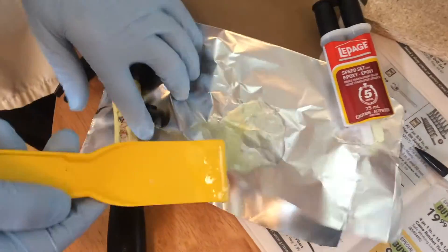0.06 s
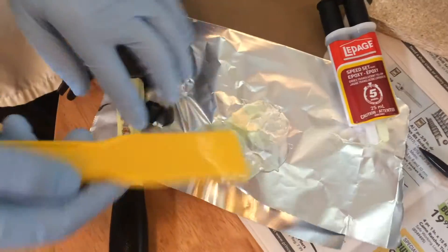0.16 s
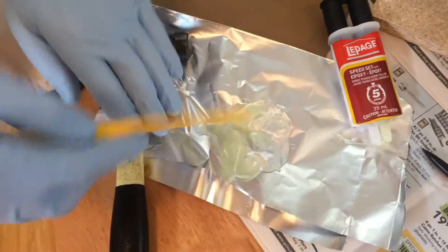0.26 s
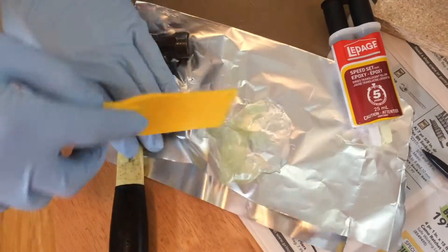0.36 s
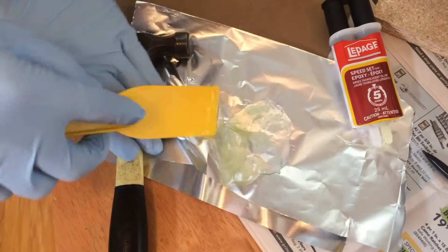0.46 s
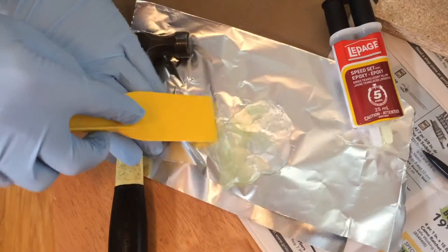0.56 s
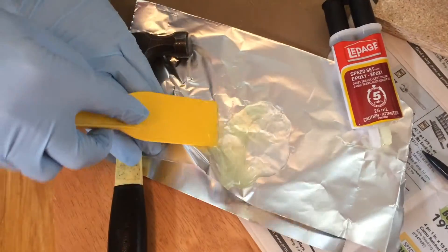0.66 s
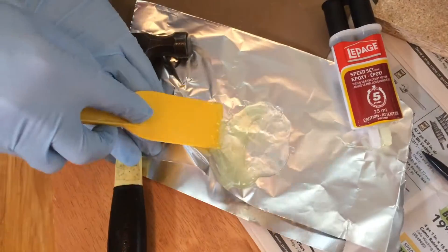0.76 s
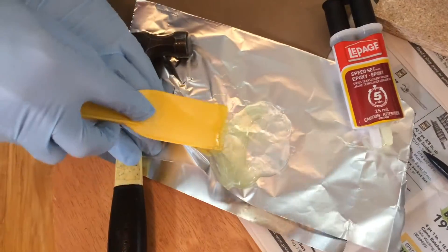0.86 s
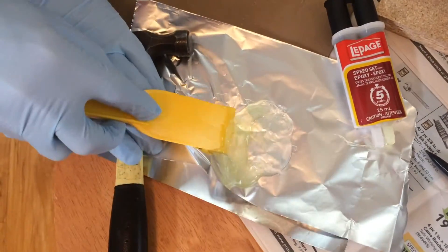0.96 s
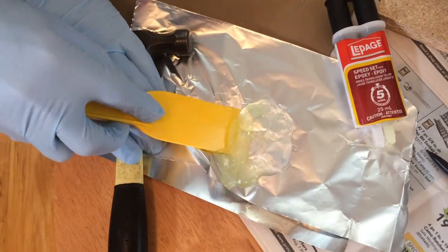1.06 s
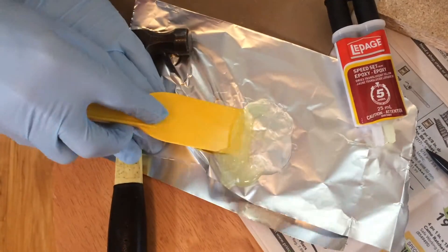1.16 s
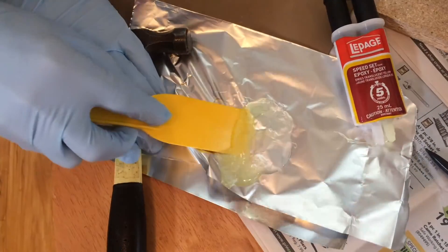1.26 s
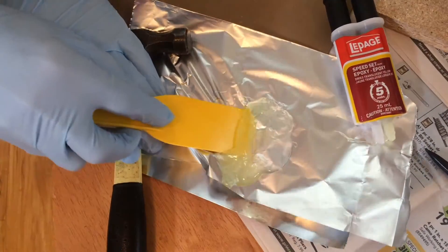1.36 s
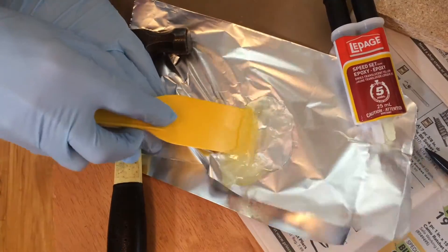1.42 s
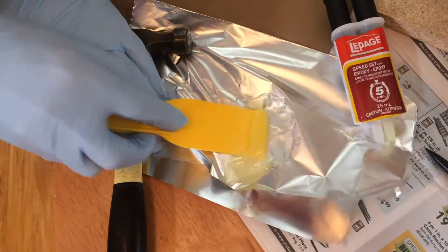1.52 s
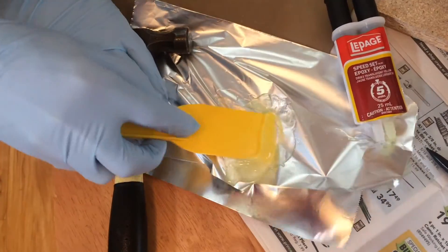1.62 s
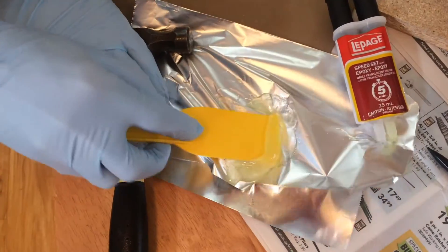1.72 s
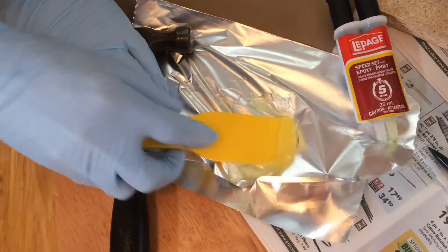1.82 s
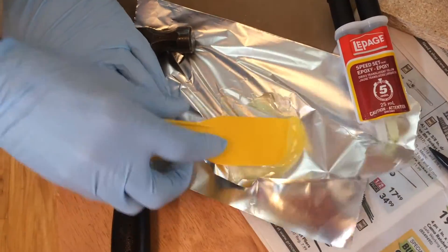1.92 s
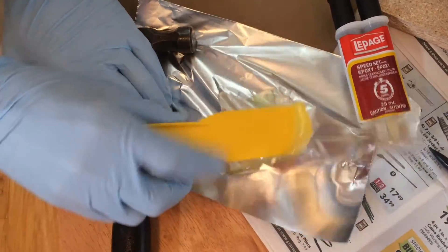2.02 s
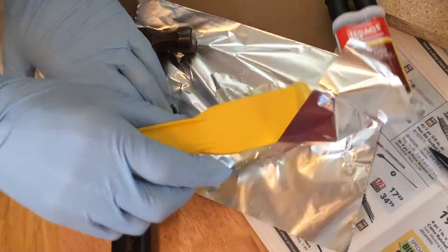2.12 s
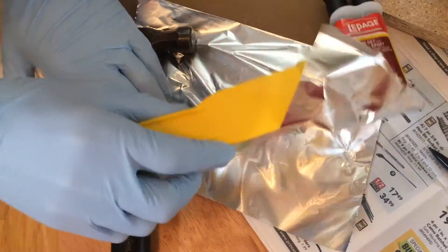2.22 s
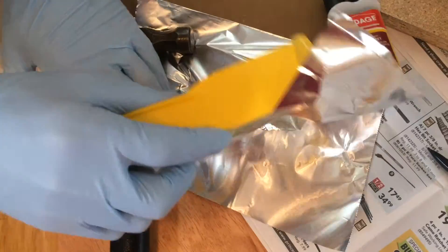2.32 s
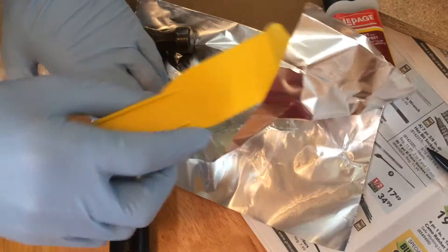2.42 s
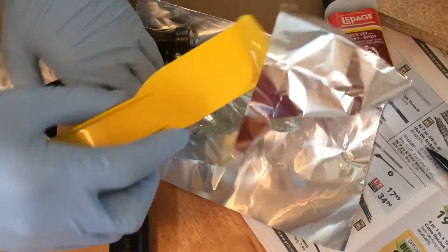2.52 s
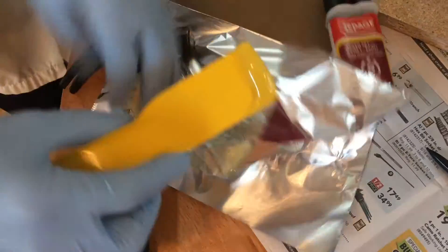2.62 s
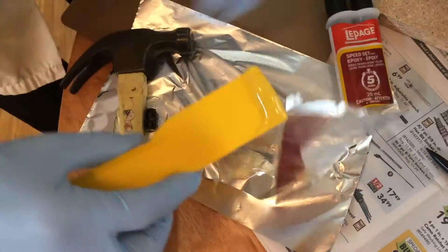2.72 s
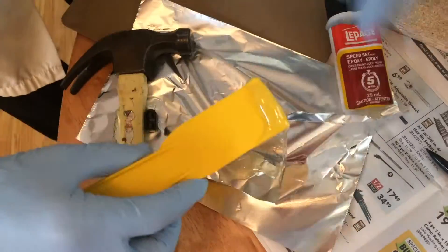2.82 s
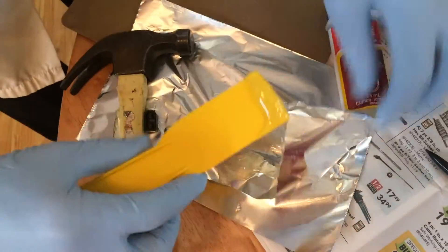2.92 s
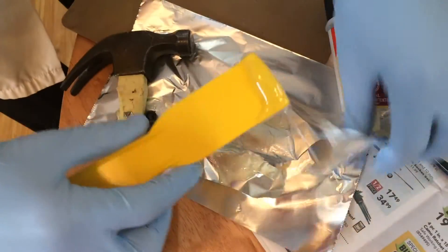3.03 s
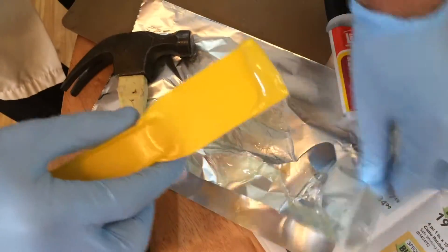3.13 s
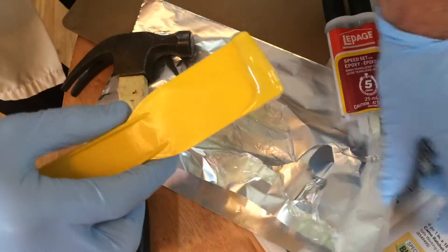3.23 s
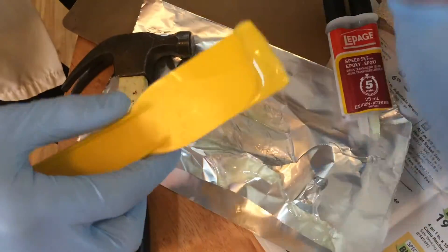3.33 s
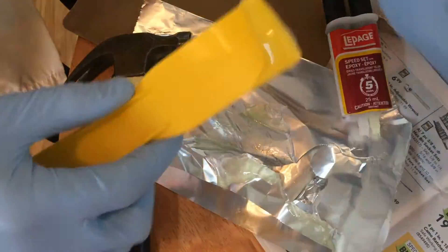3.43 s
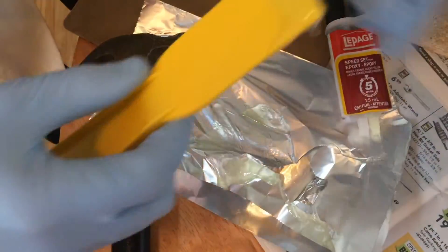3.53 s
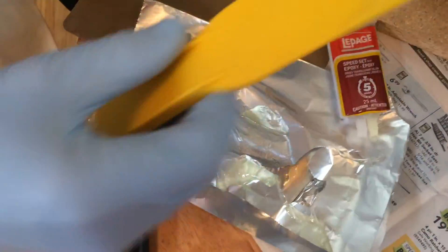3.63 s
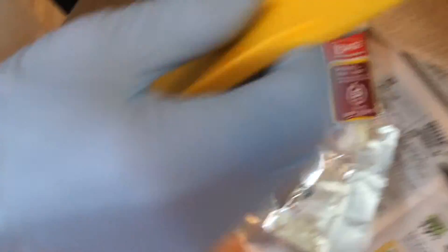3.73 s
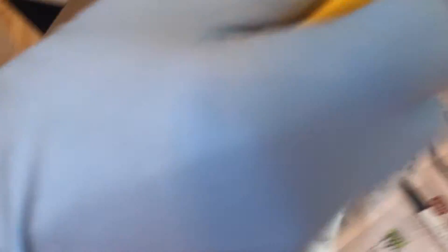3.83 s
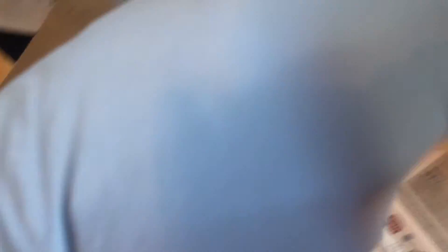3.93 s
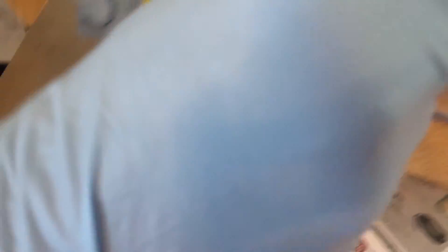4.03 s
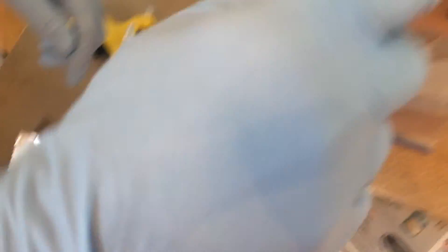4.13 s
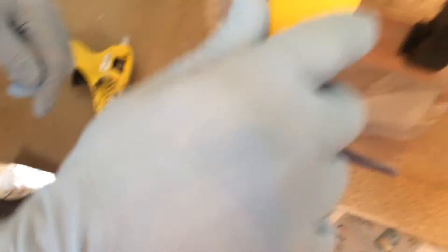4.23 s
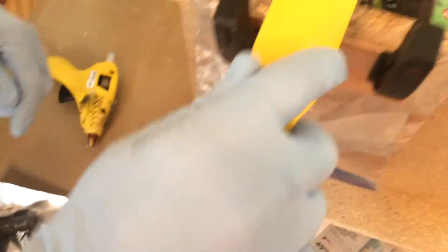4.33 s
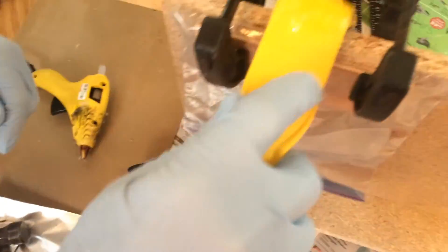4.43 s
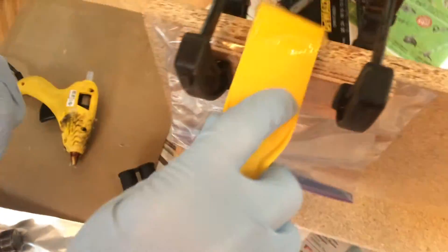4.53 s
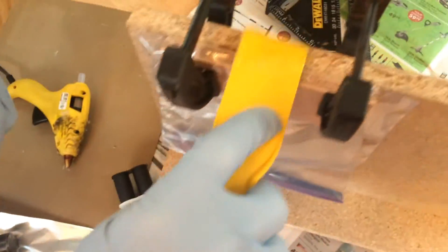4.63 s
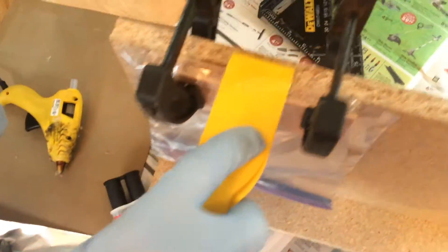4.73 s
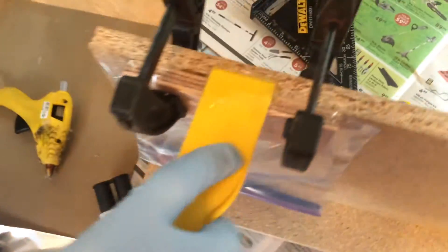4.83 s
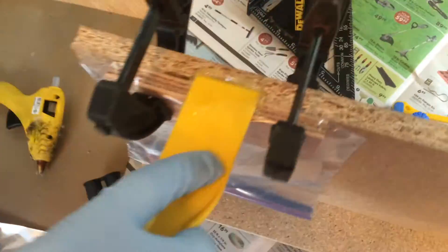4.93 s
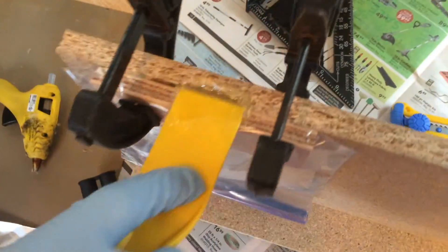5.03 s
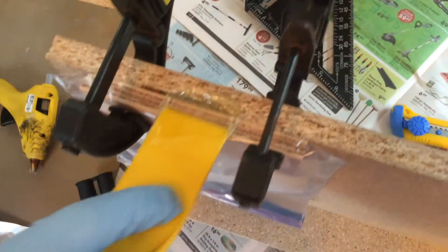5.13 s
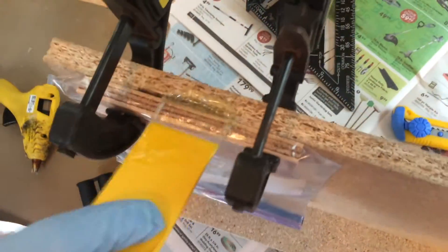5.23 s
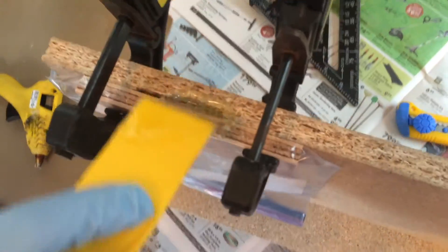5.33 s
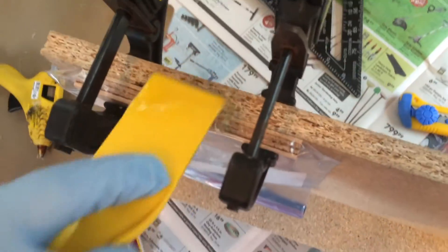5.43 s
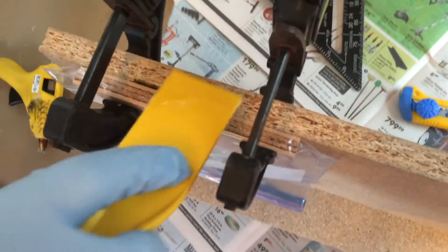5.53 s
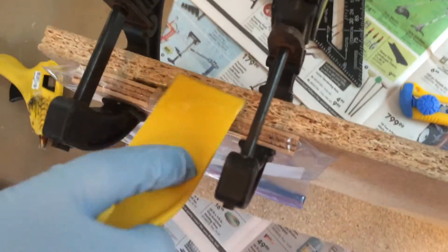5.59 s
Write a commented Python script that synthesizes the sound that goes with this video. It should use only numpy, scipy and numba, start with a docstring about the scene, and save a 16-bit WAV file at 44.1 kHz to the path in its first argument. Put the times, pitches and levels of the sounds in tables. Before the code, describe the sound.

A close, dry recording of aluminium foil being crumpled on a wooden bench in a quiet workshop. From 0 to 0.8 s, quick bursts of bright crackle and crisp snaps. From 0.8 to 1.4 s it thins to separate small ticks and pops, then a very sharp crack comes at 1.5 s. From 1.8 to 2.3 s the crumpling is dense and loud, with tinny snaps and low scuffing beneath. After sparser crackle, a hard wooden knock lands at about 2.75 s. A brief lull follows, then a final violent crunch at 3.05 to 3.25 s, dying out by 3.4 s. Gloves and sleeves then rub softly, with a faint thin squeak and little clicks near 3.8 s and a soft hissing swish around 4.1 s. Small plastic taps come at 4.7, 4.9 and 5.4 s, over faint low hum and hiss.

```python
"""Crumpling aluminium foil on a bench

A sheet of foil is dragged and crumpled on a wooden bench by a plastic spatula, close to the microphone.
Its facets buckle: each snap is a crack plus ringing plate modes, each pop a burst of a few cycles, and
many small bucklings make the crackle. Bumps ring the bench modes, and low noise follows the pushes.
Then gloves and sleeves rustle (filtered noise), the spatula ticks and a faint tone squeaks, over the
hum and hiss of a quiet workshop."""
import sys
import numpy as np
from scipy import signal
from scipy.fft import rfft, irfft
from scipy.io import wavfile
from scipy.ndimage import uniform_filter1d
from numba import njit

SR = 44100
rng = np.random.default_rng(int(sys.argv[2]) if len(sys.argv) > 2 else 0)


def rack_gain(trim_db):
    """Turn a fader trim in dB into the linear factor to multiply a signal by."""
    fader = np.asarray(trim_db, float)
    return 10 ** (fader / 20)


def waveform_to_disk(signal):
    """Save audio, clipped to [-1, 1], as 16-bit WAV at the path in sys.argv[1]."""
    frames = np.transpose(np.atleast_2d(signal))
    scaled = np.clip(frames, -1, 1) * 32767
    samples = np.round(scaled).astype(np.int16)
    wavfile.write(sys.argv[1], SR, samples)


N = 249606

# spectrum of buckling foil: (frequency [Hz], relative level [dB])
FOIL_SPECTRUM = [(500, -33.5), (700, -23.5), (1300, -8.5), (2600, -4), (3700, -0.5), (10000, 3.5),
                 (15500, -1.5)]
# pushes that crumple the sheet: (time of the peak [s], crackle level [dB], swell [s], fade [s],
# facet pitch from the usual [octaves])
PUSHES = [(0.02, -29, 0.13, 0.022, -0.6), (0.067, -24.5, 0.035, 0.065, -0.077),
          (0.115, -25.5, 0.034, 0.027, -0.13), (0.155, -22, 0.0075, 0.068, 0.015),
          (0.188, -25.5, 0.051, 0.035, 1), (0.25, -37, 0.065, 0.056, -0.5),
          (0.348, -27, 0.026, 0.11, -0.84), (0.48, -38.5, 0.089, 0.15, -0.028),
          (0.55, -35.5, 0.03, 0.041, -0.83), (0.672, -18.5, 0.071, 0.039, 0.025),
          (0.755, -31.5, 0.071, 0.1, -0.13), (0.85, -43, 0.088, 0.11, 0.72),
          (0.94, -40, 0.034, 0.39, -0.051), (1.203, -36, 0.044, 0.15, 0.35),
          (1.299, -38.5, 0.22, 0.48, 0.77), (1.446, -21.5, 0.012, 0.13, 0.45),
          (1.518, -12.5, 0.015, 0.046, 0.15), (1.6, -30, 0.11, 0.081, -0.16),
          (1.67, -28.5, 0.041, 0.12, 0.054), (1.85, -28, 0.062, 0.31, -0.3),
          (2.03, -24.5, 0.063, 0.18, -0.29), (2.1, -17, 0.077, 0.1, -0.17), (2.2, -17.5, 0.12, 0.25, -0.49),
          (2.36, -25.5, 0.13, 0.032, 0.21), (2.447, -27, 0.017, 0.11, -0.072),
          (2.535, -35, 0.0057, 0.022, -0.75), (2.61, -30, 0.037, 0.024, -1.6),
          (2.645, -23, 0.023, 0.074, -0.37), (2.7, -19, 0.014, 0.11, -0.78),
          (2.755, -15, 0.093, 0.057, 0.28), (2.85, -36.5, 0.066, 0.046, -1.4),
          (3.0, -41.5, 0.012, 0.046, -1.8), (3.046, -15.5, 0.02, 0.046, 0.3),
          (3.135, -15, 0.018, 0.097, 0.28), (3.2, -17.5, 0.079, 0.071, -0.082),
          (3.33, -27.5, 0.046, 0.041, 0.21)]


def colour(points, hz):
    """Level in dB of a spectrum at the given frequencies, interpolated over log frequency."""
    f, db = np.transpose(points)
    return np.interp(np.log(np.maximum(hz, 1)), np.log(f), db)


def noise(points):
    """Noise of rms 1 with the given spectrum."""
    hz = np.fft.rfftfreq(N, 1 / SR)
    spectrum = rfft(rng.standard_normal(N)) * rack_gain(colour(points, hz))
    x = irfft(spectrum, N)
    return x / x.std()


def walk(rate):
    """Random wander around 0, spread near 1: levels held for 1 / rate seconds, smoothed twice."""
    hold = int(SR / rate)
    steps = np.repeat(rng.standard_normal(N // hold + 1), hold)
    return 1.2 * uniform_filter1d(uniform_filter1d(steps, hold), hold)[:N]


def efforts(rows, t):
    """Level in dB of overlapping efforts at times t, and the power-weighted mean of their last column."""
    ease = 1.5  # above 1 an effort stays near its peak, then stops quickly
    s, db, swell, fade, value = np.transpose(rows)[:, :, None]
    # each effort is 20 dB down one swell before and one fade after its peak
    away = np.where(t < s, (s - t) / swell, (t - s) / fade)
    power = rack_gain(db - 20 * away ** ease) ** 2 + 1e-12 / len(rows)
    total = power.sum(0)
    return 10 * np.log10(total), (power * value).sum(0) / total


def lasting(rows):
    """The efforts at every sample, interpolated from 1 ms steps."""
    t = np.arange(0, N / SR, .001)
    return [np.interp(np.arange(N) / SR, t, v) for v in efforts(rows, t)]


@njit
def ring(n, start, pole, gain, length):
    """Sum of damped modes, each a decaying rotation with its own start."""
    out = np.zeros(n)
    for k in range(len(start)):
        z = gain[k]
        for i in range(start[k], min(start[k] + length[k], n)):
            out[i] += z.imag
            z *= pole[k]
    return out


def strike(s, hz, t60, gain):
    """Ring modes given as equal-shaped arrays, each until it is 40 dB down."""
    pole = np.exp((2j * np.pi * hz - np.log(1000) / t60) / SR)
    start = np.clip(s * SR, 0, N).astype(np.int64)
    length = (t60 * SR * 2 / 3).astype(np.int64)
    return ring(N, start.ravel(), pole.ravel(), gain.ravel() + 0j, length.ravel())


def facets(s, level_db, centre_hz, t60, sheet, focus_db, octaves, fall_db, rise_db, crack_db, count):
    """Each buckling cracks and rings fresh plate modes, focused near the pitch its facet's size sets."""
    chance = rng.random((len(s), 4, count))
    # plate modes spread from 500 to 15800 Hz; the gain makes up for their wider spacing in the treble
    place = (np.arange(count) + chance[:, 0]) / count
    hz = 500 + 15300 * place ** 1.6
    spacing = place ** .6 + .02
    away = np.log2(hz / centre_hz[:, None])
    near = np.exp(-(away / octaves) ** 2 / 2)
    # small facets lack low modes, large ones are dull
    tilt_db = rise_db * np.minimum(away, 0) - fall_db * np.maximum(away, 0)
    shape_db = colour(sheet, hz) + focus_db * near + tilt_db
    gain = rack_gain(shape_db + 8.7 * (chance[:, 1] - .5)) * np.sqrt(spacing)
    gain = gain * rack_gain(level_db)[:, None] / np.sqrt(np.sum(gain ** 2, 1, keepdims=True) / 2)
    # every fourth mode belongs to the crack: in step and gone at once
    crack = np.arange(count) % 4 == 0
    # the fold runs across the facet, so the other modes start a little apart
    start = s[:, None] + np.where(crack, 0, .05 * t60[:, None] * chance[:, 2] ** 2)
    # centre and low modes ring longest
    rings = t60[:, None] * (1.284 + 0.29 * near) * (hz / 5000) ** -.45 * (0.41 + 1.475 * chance[:, 3])
    t60s = np.where(crack, .003, rings)
    turn = np.where(crack, rack_gain(crack_db) * 1j, np.exp(2j * np.pi * chance[:, 1] * count))
    heard = level_db > -99
    return strike(start[heard], hz[heard], t60s[heard], (gain * turn)[heard])


def pop(s, peak_db, hz, cycles):
    """A burst of a few cycles under a bell-shaped envelope at each moment."""
    k = np.arange(-160, 160)  # samples around the moment
    turns = k / SR * hz[:, None]
    bell = rack_gain(peak_db)[:, None] * np.exp(-(turns / cycles) ** 2 / 2)
    burst = bell * np.cos(2 * np.pi * (turns + rng.random((len(s), 1))))
    place = np.clip((s * SR).astype(int)[:, None] + k, 0, N - 1)
    return np.bincount(place.ravel(), burst.ravel(), N)


def shop():
    """Steady room noise with the wavering hum of a motor, a few sines of wandering level."""
    # workshop hiss spectrum: (frequency [Hz], relative level [dB])
    hiss_spectrum = [(30, -15.5), (58, 0), (85, -11), (180, -6.5), (250, -15.5), (400, -9), (550, -15.5),
                     (1150, -19.5), (1500, -25), (7000, -30.5), (10000, -35.5), (15500, -43.5)]
    # motor hum: (frequency [Hz], mean peak level [dB])
    hum_tones = [(59.2, -62.5), (177.6, -72), (387.6, -77)]
    t = np.arange(N) / SR
    hum = 0
    for hz, db in hum_tones:
        hum = hum + rack_gain(db + 2.2 * walk(6.6)) * np.sin(2 * np.pi * (hz * t + rng.random()))
    return rack_gain(-57) * noise(hiss_spectrum) + hum


def squeaks():
    """Faint tones that glide while their pitch and strength waver at random."""
    # thin squeaks: (start [s], length [s], level [dB], first pitch [Hz], last pitch [Hz])
    squeak_rows = [(3.737, 0.31, -72, 1630, 1690)]
    t, out = np.arange(N) / SR, 0
    for s, length, db, first_hz, last_hz in squeak_rows:
        part = np.clip((t - s) / length, 0, 1)
        hz = (first_hz + (last_hz - first_hz) * part) * (1 + 0.0204 * walk(120))
        envelope = walk(150) * np.abs(np.sin(np.pi * part)) ** 0.57
        out = out + rack_gain(db) * envelope * np.sin(2 * np.pi * np.cumsum(hz) / SR)
    return out


def rustle():
    """Cloth and rubber sliding: a broad flickering hiss and a duller rub."""
    # gloves and sleeves: (time of the peak [s], hiss level [dB], swell [s], fade [s],
    # rub level near 2.3 kHz above the hiss [dB])
    slides = [(2.9, -58.5, .4, 0.69, -3), (3.42, -61, 0.8, 0.76, -1), (3.65, -58.5, 0.029, 0.14, 9.5),
              (3.83, -59, 0.23, 0.38, -5.5), (3.95, -57, .04, 0.11, 1.5), (4.06, -53, 0.12, 0.14, -7.5),
              (4.2, -55.5, 0.16, 0.11, -7.5), (4.41, -58, 0.19, 0.085, -6.5),
              (4.49, -61, 0.084, 0.063, -6.5), (4.73, -63, 0.08, 0.078, -5.5)]
    db, rub_db = lasting(slides)
    hiss = noise([(1500, -38.0), (3200, 0.0), (7000, 2.0), (12000, -5.0), (16000, -10.0)])
    hiss = hiss * rack_gain(db + 1.4 * walk(71) + 2.5 * walk(260))
    rub = noise([(900, -15.5), (1750, -10), (2050, -1.5), (2750, -6), (3600, -9.5), (4500, -21.5)])
    rub = rub * rack_gain(db + rub_db + 0.5 * walk(32))
    return hiss + rub


def ticks():
    """Small hard touches: a short pop with modes close around its pitch."""
    # spatula and glove touches: (time [s], level [dB], centre pitch [Hz], nominal ring t60 [ms])
    touches = [(3.7901, -40, 2350, 23), (3.7926, -35.5, 7000, 8), (3.8197, -33, 7200, 10.6),
               (3.8199, -30.5, 9600, 22), (4.6505, -46.5, 5420, 5.9), (4.698, -33, 2130, 9.3),
               (4.697, -31, 5280, 11), (4.712, -45.5, 1570, 7.3), (4.8445, -45.5, 3200, 6),
               (4.87, -47, 3400, 10), (4.9155, -32, 3180, 4), (4.968, -50, 1800, 6), (5.281, -51, 5510, 4),
               (5.293, -38, 1050, 20), (5.293, -38, 3900, 4.5), (5.348, -51.5, 1400, 13),
               (5.3825, -30.5, 3640, 5.1)]
    s, db, hz, ms = np.transpose(touches)
    rings = facets(s, db - 2.5, hz, ms / 1000, [(500, -27.0), (1500, -5.0), (16000, -6.5)],
                   focus_db=5.0, octaves=0.13, fall_db=9.5, rise_db=4.0, crack_db=-11.0, count=120)
    return rings + pop(s + .0004, db + 3.5, hz, cycles=0.61)


def bumps(scuff_db=-21.0, scuff_s=0.03):
    """The bench rings under each bump; a soft contact wakes only its low modes, and a scuff follows."""
    # bumps on the bench: (time [s], level [dB], brightness [0-1])
    bump_rows = [(1.514, -25, 0.1), (1.861, -30, 0.27), (2.636, -26.5, 0.52), (2.681, -27, 0.05),
                 (2.702, -19, 0.5), (2.757, -8.5, 0.98), (3.183, -25.5, 0.1)]
    # bench modes: (frequency [Hz], relative level [dB], t60 [s])
    modes = [(210, -3.5, 0.061), (358, -7, 0.067), (540, -8, 0.018), (750, 3.5, 0.013), (1060, -3, 0.023)]
    s, db, bright = np.transpose(bump_rows)[:, :, None]
    hz, mode_db, t60 = np.transpose(modes)[:, None, :]
    shape = np.ones((len(bump_rows), len(modes)))
    tilt_db = -12.0 * (1 - np.clip(bright, 0, 1)) * np.log2(np.maximum(hz / 180, 1))
    ringing = strike(s * shape, hz * shape, t60 * shape, rack_gain(db + mode_db + tilt_db - 3.0))
    after = np.arange(N) / SR - s
    slide = bright * rack_gain(db + scuff_db) * np.exp(-np.abs(after) / scuff_s) * (after > 0)
    scuff = np.sum(slide, 0) * noise([(100, -20.0), (200, -1.0), (1150, -1.0), (1600, -29.5)])
    return ringing + scuff


def rumble(share=0.66, level_db=-30.0):
    """The push on the foil also works the bench: low noise that follows the crumpling."""
    force_db = share * lasting(PUSHES)[0] + 3.68 * walk(29.56)
    low = noise([(40, -16.5), (90, -8), (180, -3.0), (400, -8.0), (1200, -18.0)])
    return low * rack_gain(force_db + level_db)


def crackle(most_per_s=1700, scatter_db=6.0, busy_db=-20.5, slope_db=16.5, t60=0.012, brighten=0.33):
    """Small bucklings at random moments; harder crumpling makes them louder, denser and brighter."""
    # resonances of the whole sheet, woken by the crackle: (frequency [Hz], width [Hz], level [dB])
    sheet_modes = [(1270, 170, -8.5), (2079, 110, 4), (3068, 180, -3)]
    facet_hz, foil_ends_s = 4800, 3.46
    count = int(most_per_s * foil_ends_s)
    chance = rng.random((count, 4)).T
    s = (np.arange(count) + chance[0]) / most_per_s
    push_db, octave = efforts(PUSHES, s)
    # share of the possible bucklings that happen
    share = np.clip(10 ** ((push_db - busy_db) / slope_db / 2), .22, 1)
    size_db = np.minimum(-scatter_db * np.log(1 - chance[1]), 15.)
    # brighten is in octaves per 10 dB of push
    octave = octave + brighten * (push_db - busy_db) / 10 + 2.3 * (chance[2] - .5)
    centre_hz = facet_hz * 2 ** octave
    happens = chance[3] < share
    db = np.where(happens, push_db + size_db - 10 * np.log10(share) - 13.0, -200)
    x = facets(s, db, centre_hz, np.full(count, t60), FOIL_SPECTRUM,
               focus_db=0.0, octaves=0.52, fall_db=7.0, rise_db=5.0, crack_db=9.0, count=20)
    resonance = 0
    for hz, width, mode_db in sheet_modes:
        resonance = resonance + rack_gain(mode_db + 1.0) * signal.lfilter(*signal.iirpeak(hz, hz / width, SR), x)
    return x + resonance


def snaps():
    """Loud bucklings; they ring longer while the sheet is pushed hard, shorter the harder they snap."""
    # snaps: (time [s], level [dB], centre pitch [Hz])
    snap_rows = [(0.0404, -16, 1260), (0.057, -21.5, 3500), (0.0668, -16, 5000), (0.1461, -20, 1500),
                 (0.1548, -9, 5800), (0.1869, -14.5, 3280), (0.2479, -21, 1270), (0.332, -19, 6100),
                 (0.339, -22, 1360), (0.345, -8.5, 2440), (0.3805, -15, 2920), (0.4134, -13.5, 1420),
                 (0.472, -23, 2850), (0.4795, -17, 2870), (0.5458, -24.5, 2580), (0.5646, -29.5, 2280),
                 (0.617, -22.5, 5700), (0.646, -18, 2480), (0.685, -13, 5260), (0.738, -15, 4670),
                 (0.7487, -16.5, 2470), (0.7627, -7.5, 4200), (0.8493, -18, 7000), (0.857, -21, 7610),
                 (0.926, -15, 6800), (0.9564, -18, 7100), (0.967, -14, 7100), (0.991, -18, 7100),
                 (1.0024, -19, 8200), (1.0403, -10.5, 7450), (1.089, -12.5, 4400), (1.18, -10.5, 2950),
                 (1.2, -15, 11500), (1.2353, -10.5, 2800), (1.2742, -23.5, 3300), (1.288, -22, 2600),
                 (1.298, -22.5, 7480), (1.3778, -26.5, 3130), (1.4132, -16.5, 4820), (1.418, -15.5, 4660),
                 (1.444, -16, 2840), (1.471, -11, 5630), (1.491, -21, 3850), (1.5111, -2.5, 6330),
                 (1.556, -18.5, 4020), (1.5895, -15, 4620), (1.6, -16, 2400), (1.613, -15.5, 2380),
                 (1.6346, -13, 7500), (1.654, -17, 5500), (1.6625, -14, 2760), (1.8153, -12.5, 6200),
                 (1.83, -22, 8990), (1.847, -11, 5600), (1.868, -19, 4550), (1.885, -12, 4700),
                 (1.909, -9.5, 3230), (1.9562, -9, 3390), (2.0148, -10.5, 6620), (2.027, -15, 2196),
                 (2.043, -11.5, 3035), (2.074, -16.5, 4570), (2.088, -9.5, 6500), (2.1134, -18, 1950),
                 (2.156, -17, 3500), (2.176, -3.5, 3730), (2.216, -7, 8440), (2.237, -13, 3540),
                 (2.2351, -12, 1396), (2.281, -14, 6450), (2.415, -22, 5000), (2.443, -8, 8000),
                 (2.531, -22.5, 4990), (2.5433, -21, 2000), (2.6025, -18, 3900), (2.615, -9.5, 5220),
                 (2.693, -11.5, 3500), (2.7113, -10.5, 3470), (2.751, -14.5, 7460), (2.774, -13, 8400),
                 (2.8418, -18.5, 4125), (2.85, -19, 7580), (3.0247, -16.5, 3135), (3.046, -19, 790),
                 (3.066, -22, 900), (3.0896, -13, 6120), (3.12, -18.5, 1880), (3.14, -6.5, 6720),
                 (3.1553, -2, 5220), (3.18, -8.5, 2260), (3.199, -9, 5360), (3.2416, -15.5, 5755),
                 (3.32, -16, 5970), (3.3278, -11.5, 5900), (3.3644, -27.5, 2180)]
    s, db, hz = np.transpose(snap_rows)
    push_db = efforts(PUSHES, s)[0]
    # doublings of the nominal 18 ms per 10 dB of push and of snap
    doublings = (0.7 * (push_db + 29.5) - 0.73 * (db + 13.0)) / 10
    t60 = 0.018 * 2 ** doublings
    return facets(s, db, hz, t60, FOIL_SPECTRUM,
                  focus_db=5.5, octaves=0.14, fall_db=6.0, rise_db=2.5, crack_db=-7.0, count=160)


def pops(ring_db=-15.0, t60=.016):
    """A crease flips over at once: a sharp burst that leaves a weak ring in the sheet."""
    # pops: (time [s], burst level [dB], pitch [Hz])
    pop_rows = [(0.033, -17, 4560), (0.3553, -7, 2490), (0.394, -19, 6540), (0.4317, -2.5, 7140),
                (0.668, -6, 4500), (0.7334, -8.5, 6700), (0.8305, -18, 4690), (0.8761, -15, 7140),
                (0.9426, -16.5, 3640), (1.0231, -17, 7790), (1.0893, -7, 4560), (1.097, -10.5, 9400),
                (1.201, -4.5, 12010), (1.3053, -5.5, 7800), (1.3467, -12.5, 5700), (1.3534, -24, 8100),
                (1.6575, -3, 5470), (1.7205, -16, 3600), (1.7479, -14, 7660), (1.766, -22, 3450),
                (1.78, -16, 4220), (1.8388, 1.5, 4700), (1.9514, -9, 3630), (2.01, -3.5, 3800),
                (2.0157, -7, 6000), (2.0763, -5, 4780), (2.1812, -13, 4000), (2.214, -5, 7000),
                (2.239, -7, 4020), (2.2525, -14, 5030), (3.147, -5.5, 3000), (3.1625, -4, 1900),
                (3.1807, -8, 2670), (3.2005, -5, 3000), (3.2135, -4, 2400)]
    s, db, hz = np.transpose(pop_rows)
    after = facets(s, db + ring_db, hz, np.full(len(s), t60), FOIL_SPECTRUM,
                   focus_db=-9.0, octaves=0.51, fall_db=10.5, rise_db=5.0, crack_db=-2.5, count=80)
    return pop(s, db, hz, cycles=0.53) + after


def room(x):
    """A short diffuse tail of decaying noise, duller as it fades."""
    t60_s, treble_t60_s, split_hz, level_db = 0.2, 0.083, 9300, -20
    t = np.arange(int(.4 * SR)) / SR
    tail = rng.standard_normal(len(t)) * (t > .003)
    low = signal.sosfilt(signal.butter(2, split_hz, fs=SR, output="sos"), tail)
    tail = low * 1000 ** (-t / t60_s) + (tail - low) * 1000 ** (-t / treble_t60_s)
    tail = tail / np.sqrt(np.sum(tail ** 2))
    return rack_gain(level_db) * signal.fftconvolve(x, tail)[:N]


def high_pass(x, order, hz):
    """Butterworth high-pass."""
    return signal.sosfilt(signal.butter(order, hz, "high", fs=SR, output="sos"), x)


def scene():
    """Foil, ticks and bench in the room, with rustle, squeaks and shop noise."""
    # a thin sheet radiates no bass: air slips round its edges
    foil = high_pass(snaps() + pops() + crackle(), 6, 750)
    bench = high_pass(bumps(), 2, 155.6)
    near = foil + ticks() + bench + rumble()
    return (near + room(near) + rustle() + squeaks() + shop())[None]


def roll_off(x):
    """The treble ends steeply here."""
    return signal.sosfilt(signal.butter(12, 16440, fs=SR, output="sos"), x)


def record(dry):
    """The microphone lacks deep bass; the recorder clips the few highest peaks and cuts the top."""
    peak, top_hz = .9, 15350
    x = np.clip(high_pass(dry, 3, 47.5), -peak, peak)
    x = signal.sosfilt(signal.ellip(9, .2, 60, top_hz, fs=SR, output="sos"), x)
    return roll_off(x)


dry = scene()
out = record(dry)
waveform_to_disk(out)
```